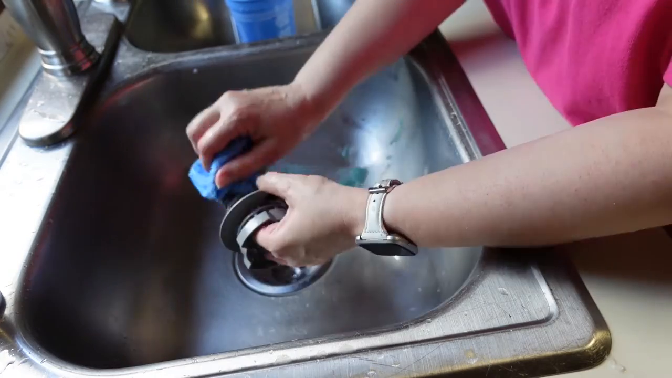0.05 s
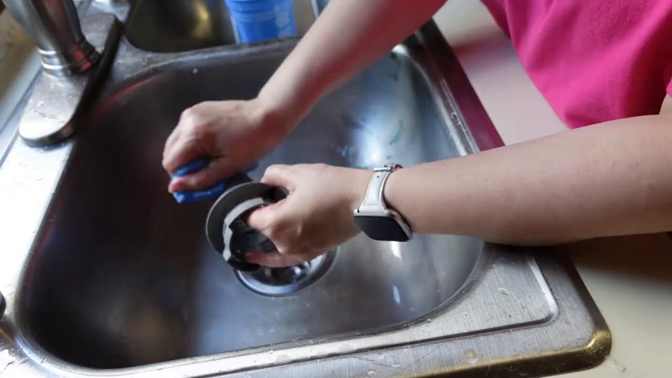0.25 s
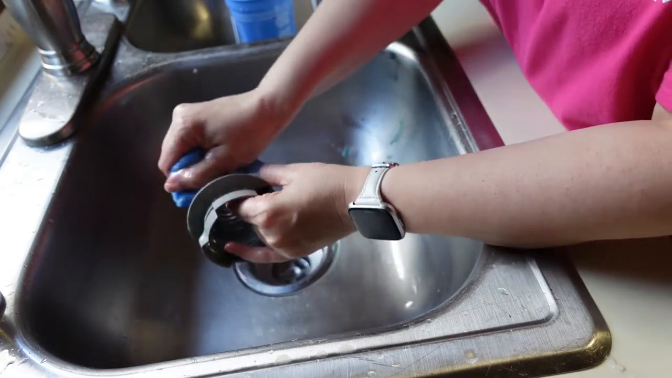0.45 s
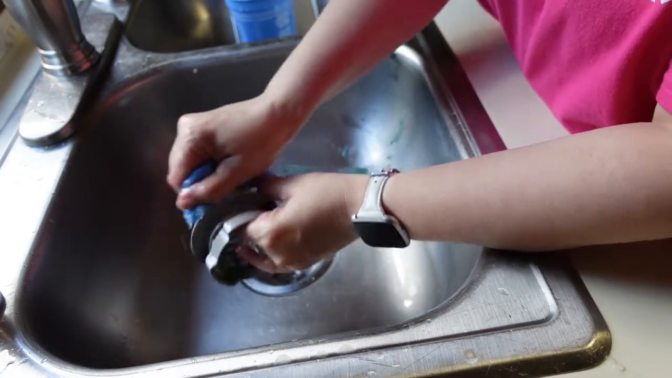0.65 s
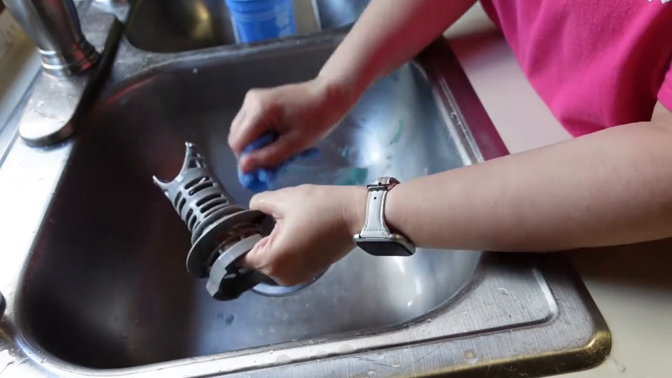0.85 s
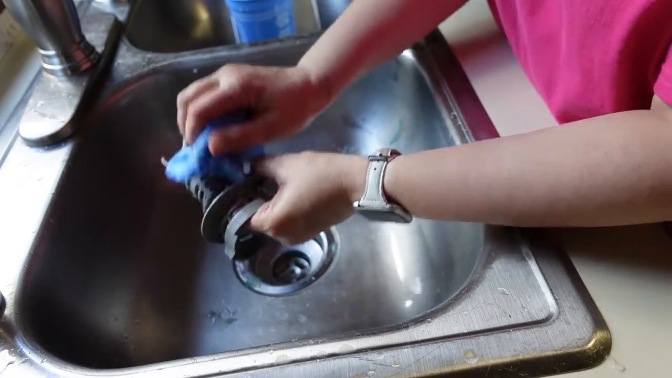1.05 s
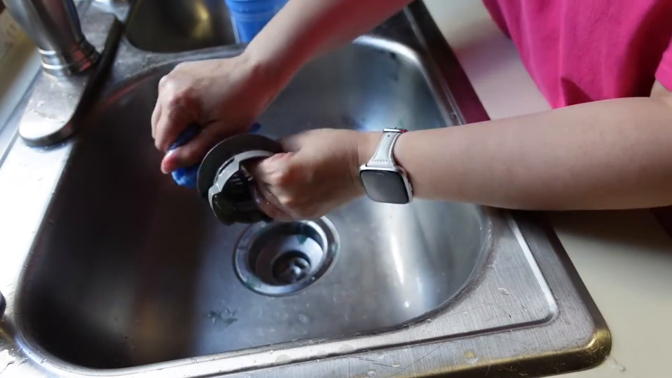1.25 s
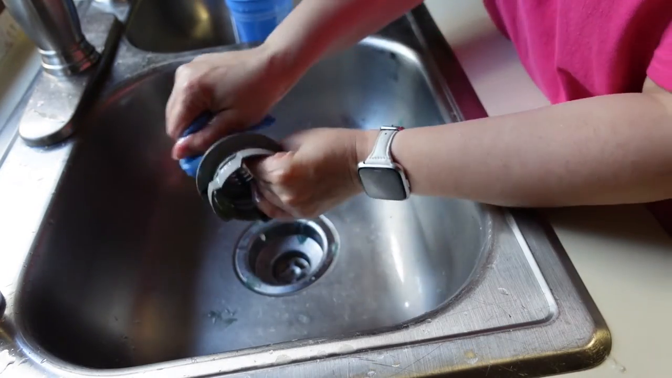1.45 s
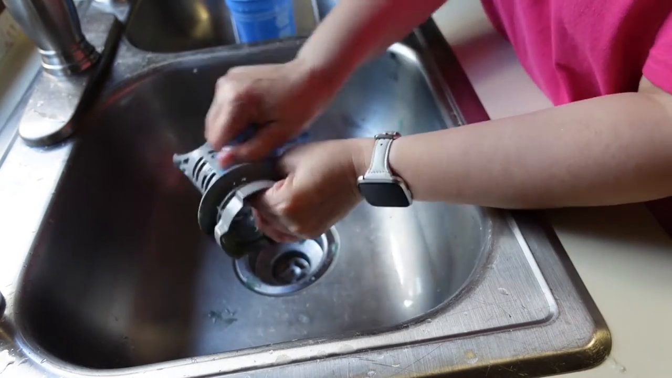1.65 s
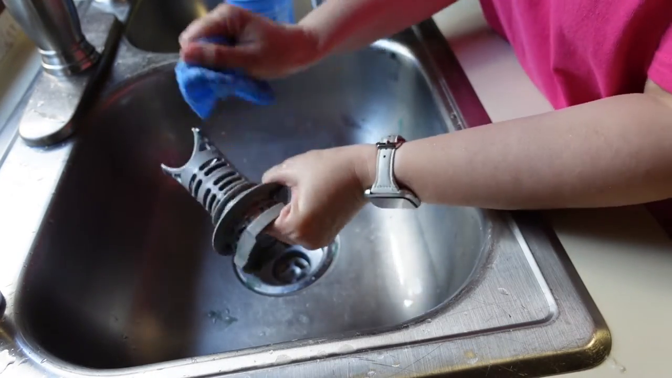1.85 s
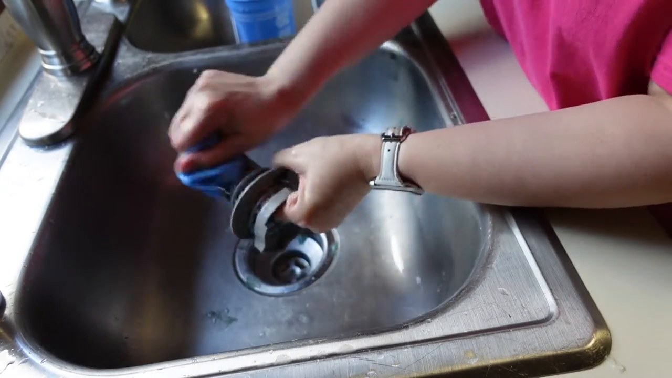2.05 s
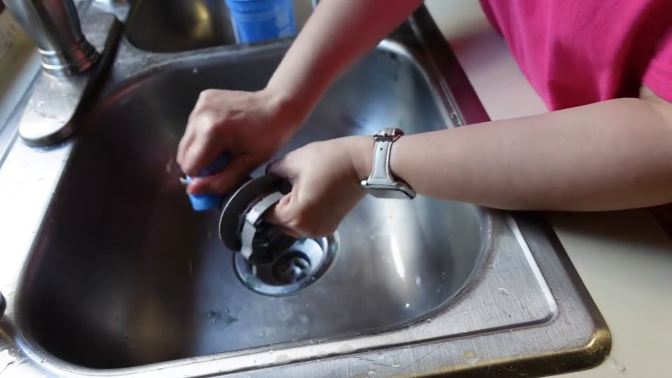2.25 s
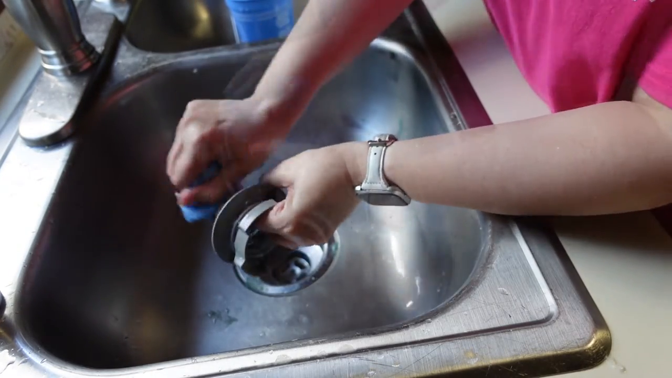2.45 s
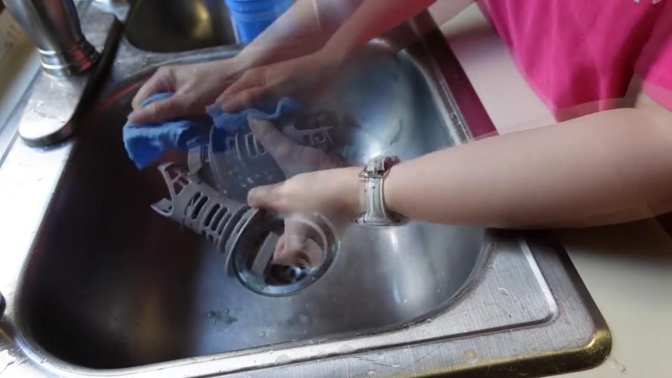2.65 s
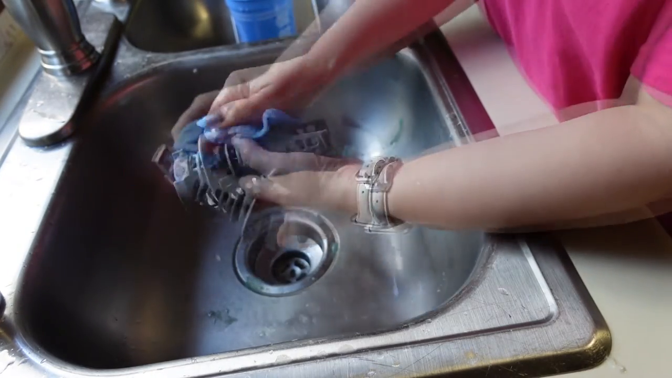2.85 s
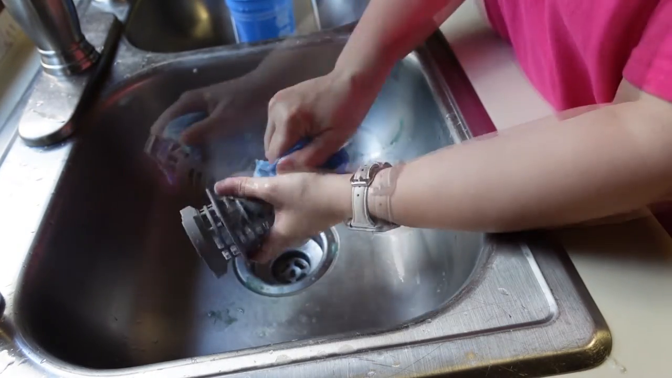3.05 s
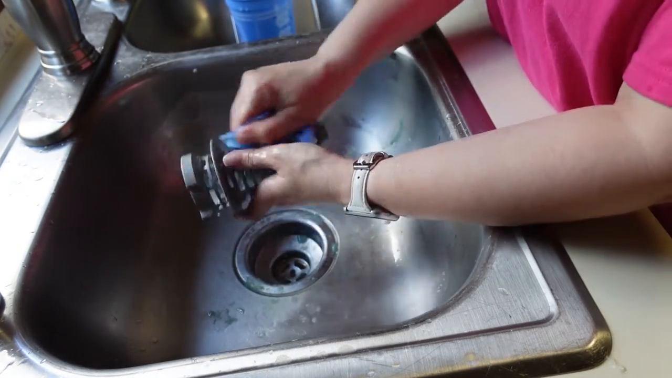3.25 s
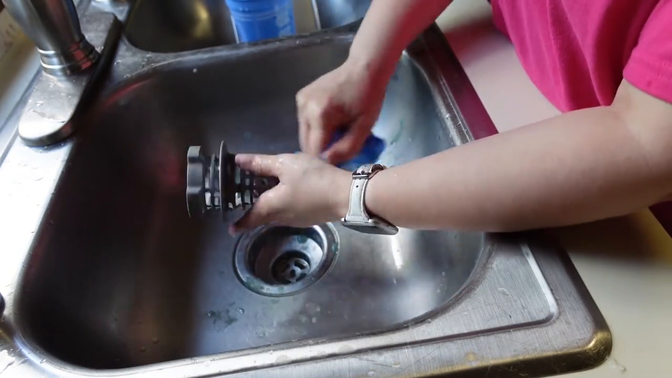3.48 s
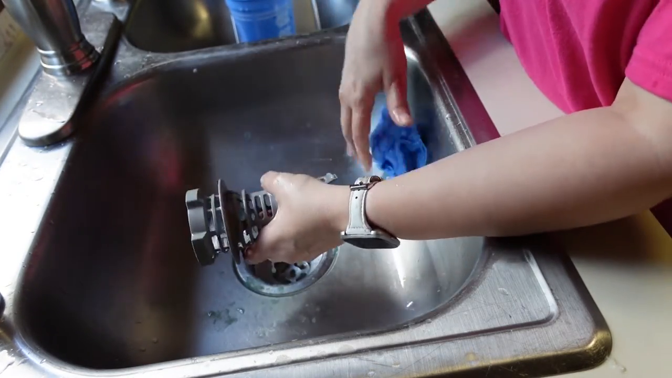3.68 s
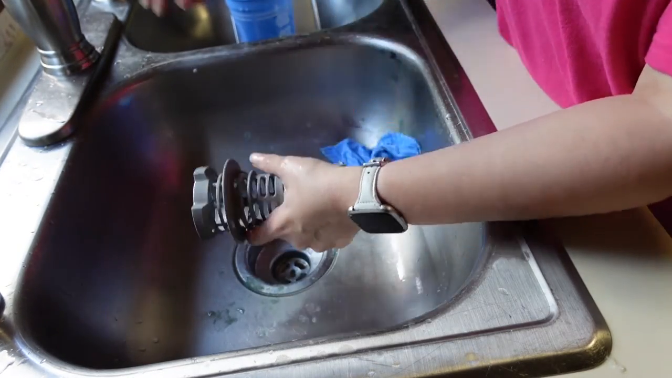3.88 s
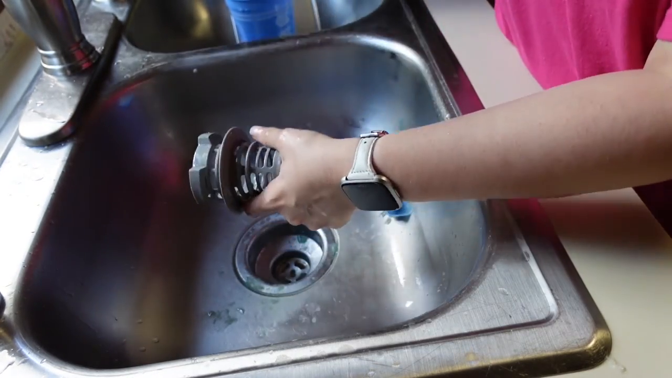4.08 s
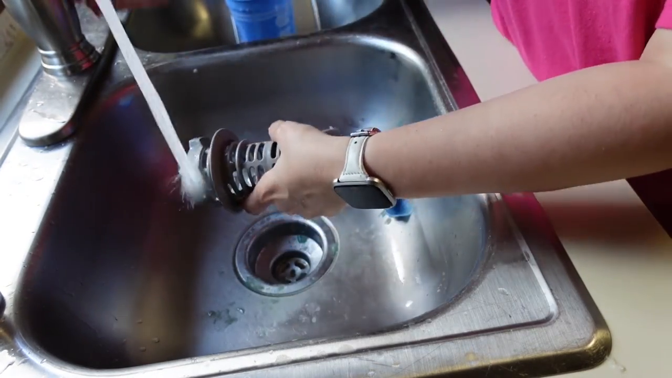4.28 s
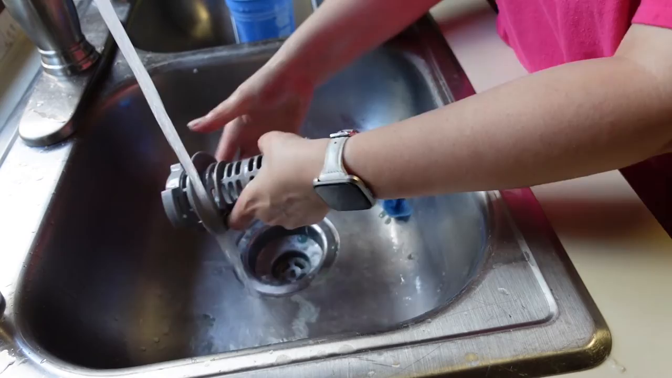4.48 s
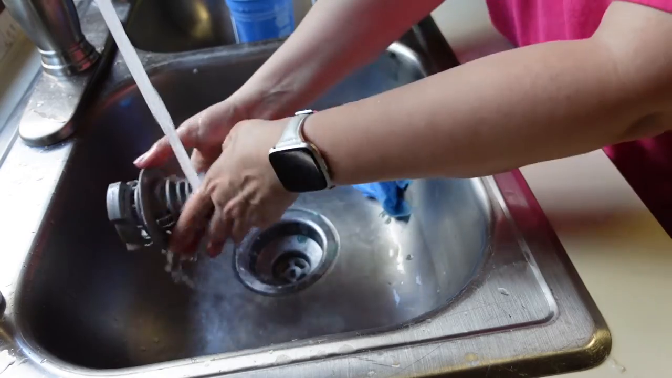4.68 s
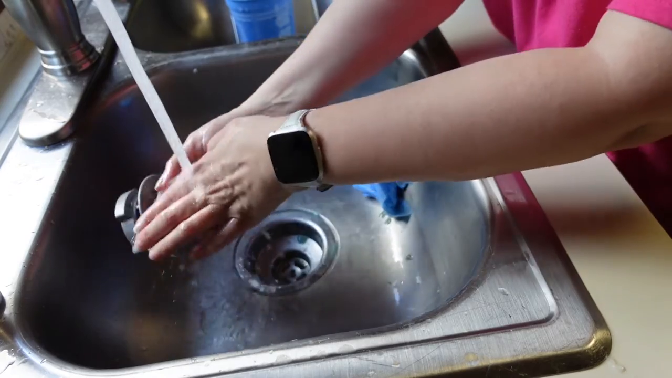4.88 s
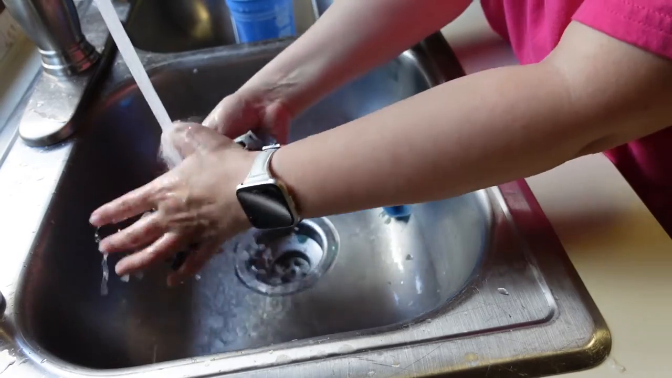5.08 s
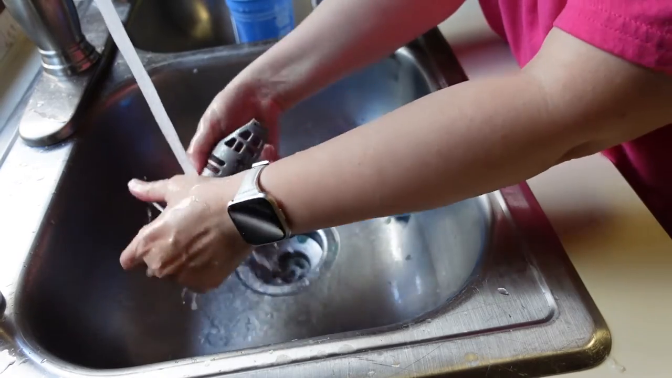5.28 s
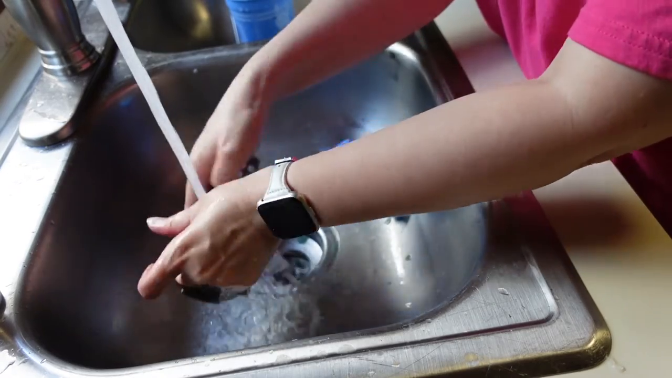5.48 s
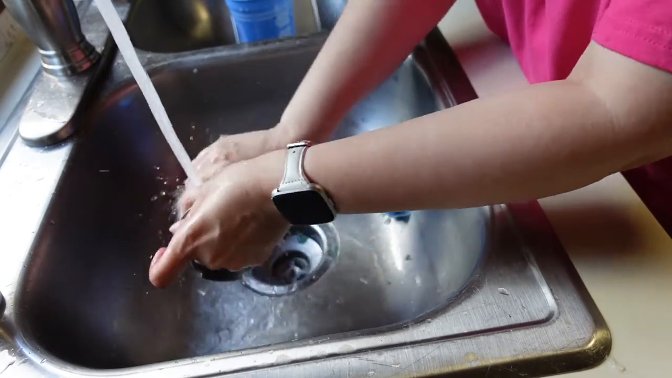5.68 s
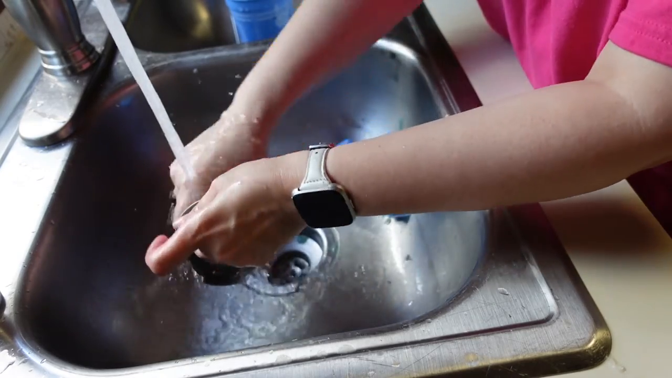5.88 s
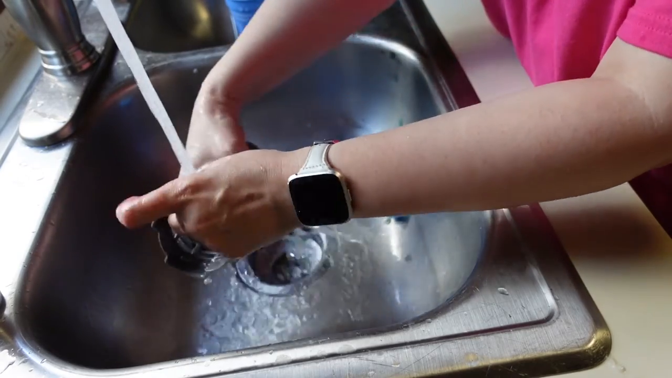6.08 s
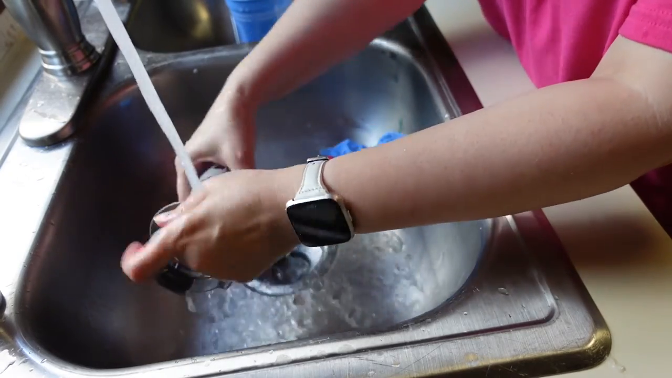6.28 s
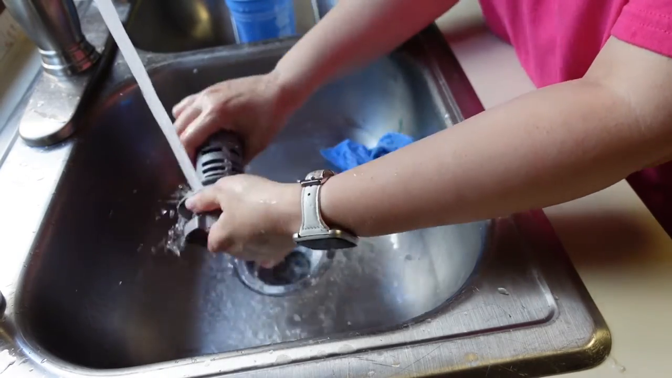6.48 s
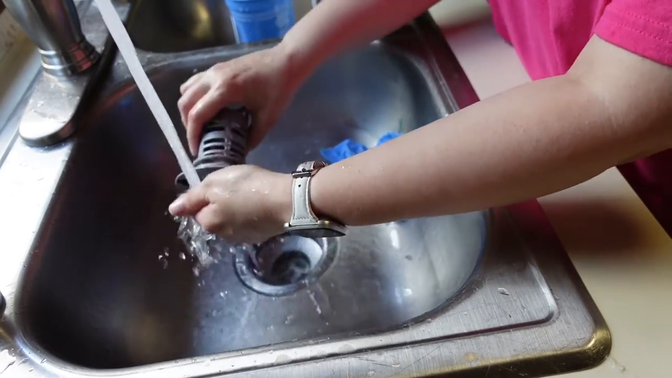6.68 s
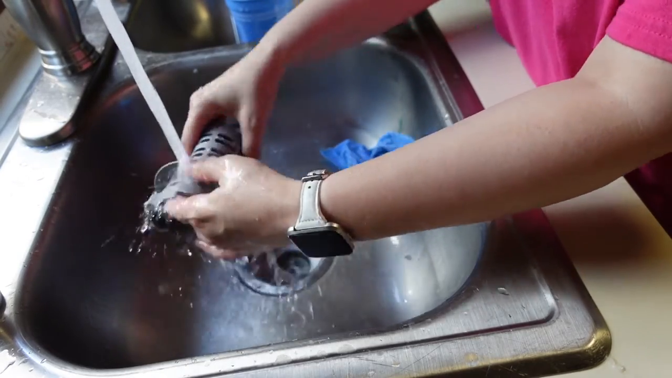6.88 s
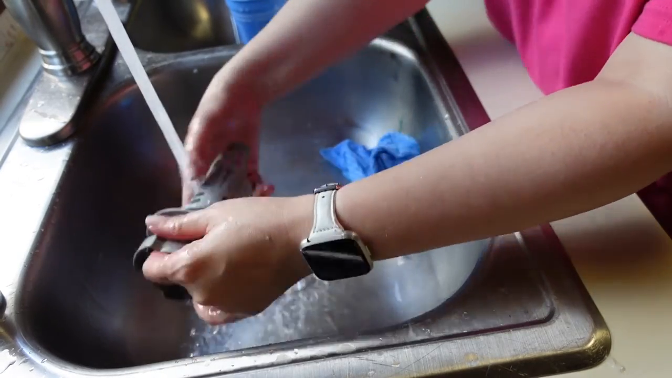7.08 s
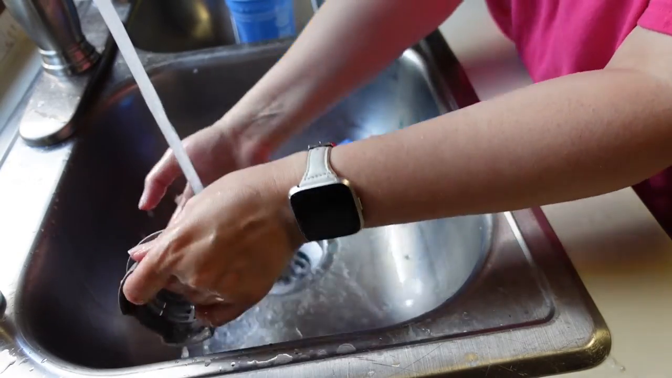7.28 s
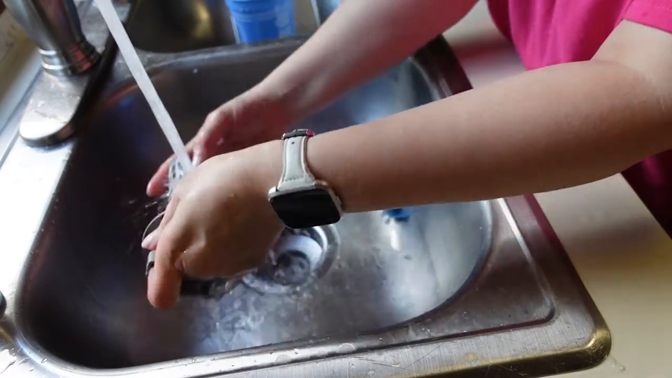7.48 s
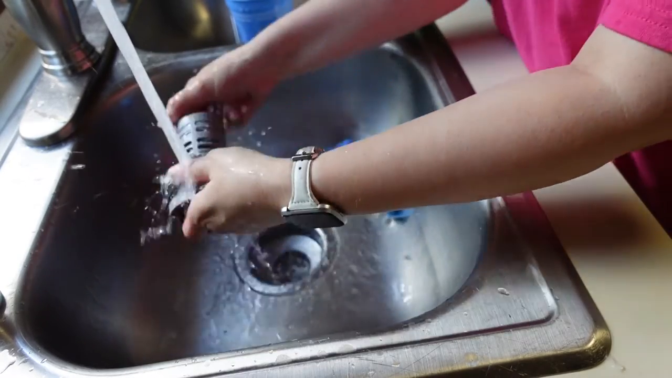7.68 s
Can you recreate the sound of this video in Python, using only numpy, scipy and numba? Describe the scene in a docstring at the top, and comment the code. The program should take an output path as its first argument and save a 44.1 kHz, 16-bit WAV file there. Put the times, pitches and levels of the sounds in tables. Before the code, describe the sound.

A wet cloth rubs a ribbed plastic part in soft crackly strokes over a steel sink, then a tap opens and splashes hissing water with knocks.

```python
"""A hand wipes a slotted plastic part with a wet cloth over a steel kitchen sink, then rinses it under the tap.
Stick-slip friction crackles stroke by stroke and rumbles the basin; part and handle knock on its modes.
At 4.1 s the tap opens: turbulence hisses and the spout resonates; from about 4.36 s droplets and bubbles
spatter as tiny rings, gushes swell the spray and falling water drums the steel, with more knocks to the end.
Faint room noise lies under it all."""
import sys
import numpy as np
from scipy import signal
from scipy.fft import rfft, irfft, next_fast_len
from scipy.io import wavfile
from scipy.ndimage import uniform_filter1d
from numba import njit

SR = 44100
rng = np.random.default_rng(int(sys.argv[2]) if len(sys.argv) > 2 else 0)


def nominal_scale(level):
    """Amplitude ratio for a level in decibels (scalar or array-like)."""
    x = np.asarray(level, float) / 20
    return 10 ** x


def unload_audio(sound):
    """Save the sound as a 16-bit wav file, at the path given as the first command line argument."""
    columns = np.transpose(np.atleast_2d(sound))
    # keep every value between -1 and 1, then stretch to whole-number steps
    steps = np.round(np.clip(columns, -1, 1) * 32767)
    wavfile.write(sys.argv[1], SR, steps.astype(np.int16))


N = 340893  # samples
SILENCED_S = .059  # the first strokes and knocks stop dead here

# Spectral density of the rustling weave: f/Hz, relative level/dB
RUSTLE_SPECTRUM = [(410, -50), (700, -18), (1050, -12), (1740, -6), (2010, -6), (2200, -1), (5550, -1.5),
                   (10400, -8), (14400, -29), (15700, -28)]
# Cloth strokes: t/s of the peak, level/dB at the peak, time/s to rise by 20 dB, time/s to fall by 20 dB, f/Hz
# of the rubbed ribs
CLOTH_STROKES = [(0.0, -43, .01, .06, 3150), (0.021, -34, .005, .07, 5350), (0.153, -37.5, .09, .16, 4570),
                 (0.21, -45, .06, .1, 4200), (0.268, -43, .07, .07, 5170), (0.356, -36, .007, .09, 3520),
                 (0.4, -41, .04, .1, 4540), (0.51, -40, .07, .12, 5050), (0.669, -36, .065, .12, 4200),
                 (0.725, -41, .06, .18, 4300), (1.05, -54, .25, .3, 4650), (1.19, -45, .09, .08, 4220),
                 (1.28, -45, .06, .07, 4800), (1.34, -45.5, .05, .11, 3460), (1.495, -45, .05, .08, 5460),
                 (1.672, -39, .16, .09, 4700), (1.75, -50, .1, .35, 4600), (2.011, -41, .012, .025, 3160),
                 (2.047, -36, .01, .1, 5140), (2.1, -41, .04, .08, 4200), (2.2, -40, .1, .06, 4800),
                 (2.273, -50, .012, .2, 5200), (2.325, -46, .08, .05, 5500), (2.405, -39, .07, .05, 5260),
                 (2.505, -44.5, .07, .1, 5570), (2.555, -46, .07, .11, 4520), (2.72, -56, .25, .06, 4660),
                 (2.775, -51, .04, .14, 3480), (2.922, -49, .04, .2, 4660), (3.022, -51, .12, .06, 4100),
                 (3.27, -46, .14, .07, 5250), (3.445, -42.5, .15, .2, 5400), (3.686, -47, .02, .08, 4800),
                 (3.765, -60, .03, .3, 5000)]
DULL_DB, DULL_PER_DB = -5.5, -0.26  # low-end shelf for a stroke at -49 dB; a firmer stroke is brighter


def strokes():
    """Stick-slip friction: wet weave dragged over ribs rustles as noise and crackles as many short rings."""
    columns = np.transpose(CLOTH_STROKES)
    before = swells(*columns)
    after = swells(*columns[:, columns[0] > SILENCED_S])
    stroke_db, rib_hz = np.where(np.arange(N) < SILENCED_S * SR, before, after)
    dull_db = np.clip(DULL_DB + DULL_PER_DB * (stroke_db + 49), -30, 12)
    weave = level(colour(rng.standard_normal(N), RUSTLE_SPECTRUM), -0.25)
    rustle = patchy(weave, rate=45., depth_db=1.35) * nominal_scale(1.26 * walk(50))
    crackle = nominal_scale(-6) * grains(rib_hz, octaves=0.3, per_s=1300.0, cycles=79.0, scatter_db=8.5, glide=0.96)
    scratches = nominal_scale(-11) * flurries(rib_hz, count=350, t60=.02, scatter_db=3., octaves=.5, cycles=12.)
    return (tilt(rustle, 2400.0, "low", dull_db) + crackle + scratches) * nominal_scale(stroke_db)


# Handling passed on to the basin as rumble: t/s, level/dB
HANDLING_RUMBLE = [(0.0, -60), (0.025, -45), (0.06, -64), (0.2, -80), (0.46, -63.5), (0.85, -74.5),
                   (1.03, -64), (1.4, -74), (1.75, -65.5), (1.99, -72), (2.03, -61), (2.35, -72),
                   (2.9, -88), (3.4, -75), (3.72, -66), (3.985, -78), (4.01, -57), (4.05, -51), (4.12, -55)]


def handling():
    """Structure-borne sound: handling shakes the basin and excites its modes."""
    return nominal_scale(curves(HANDLING_RUMBLE)[0]) * drumming(count=4000, scatter_db=3.0, fall_db=3.0)


# Cloth snagging on a slot: t/s, relative peak level/dB, centre f/Hz
SLOT_SNAGS = [(0.0188, -16.5, 1880), (0.1161, -27, 3850), (0.126, -20, 5540), (0.151, -20, 4440),
              (0.3117, -22, 6240), (0.3306, -20, 5520), (0.3541, -24, 2510), (0.3661, -20, 5480),
              (0.3965, -32, 3690), (0.4943, -37, 3800), (0.5207, -23, 4600), (0.555, -27, 2630),
              (0.621, -28, 3220), (0.636, -30, 3450), (0.6644, -16, 4020), (0.7173, -20, 4280),
              (0.799, -22.5, 4030), (0.9606, -24, 5920), (1.0301, -30, 3260), (1.047, -31, 3320),
              (1.0839, -23, 7630), (1.1179, -34, 3310), (1.265, -27, 4380), (1.329, -35, 3150),
              (1.4805, -29, 7710), (1.7933, -24, 7460), (1.931, -33, 5530), (2.0058, -35, 4600),
              (2.0133, -25, 2580), (2.0448, -18, 4700), (2.162, -33, 3950), (2.1839, -26, 2750),
              (2.2049, -28, 6600), (2.2707, -25, 6790), (2.365, -33, 3820), (2.4044, -17, 5800),
              (2.5551, -28, 3900), (2.919, -24, 4500), (3.113, -32, 5440), (3.3308, -35, 4240),
              (3.4251, -34, 5560), (3.494, -27, 3670), (3.6825, -27, 4800), (3.763, -31, 6630)]


def snags():
    """Sudden slip: each snag lets go in a swarm of short rings that dies by 60 dB in 12 ms."""
    return nominal_scale(-10.0) * bursts(SLOT_SNAGS, .012, rise_s=.0004, octaves=0.393, cycles=24.3, count=40)


def cloth():
    """Superposition of friction, handling rumble and snags; the first two end with the handling table."""
    wiping = np.arange(N) < HANDLING_RUMBLE[-1][0] * SR
    return (strokes() + handling()) * wiping + snags()


# Spectral density of the spray: f/Hz, relative level/dB
SPRAY_SPECTRUM = [(35, -56), (60, -55), (87, -28), (160, -20), (192, -21.5), (243, -11.5), (286, -27),
                  (536, -23.5), (662, -14.5), (896, -19.5), (1760, -12.5), (2620, -6), (4800, -1),
                  (9650, -5), (15700, -24)]
OPEN_DB, FINE_PER_DB = -27, 1.5  # below this flow the spray turns coarser
FINE_DB = -1  # mean shelf on the top of the hiss at full flow


def jet_hiss(flow_db):
    """Turbulence noise: the jet hisses over a broad band, with less treble at low flow."""
    fine_db = FINE_DB + FINE_PER_DB * np.clip(flow_db - OPEN_DB, -20, 0) + 2.6 * walk(14)
    noise = level(colour(rng.standard_normal(N), SPRAY_SPECTRUM), -2.5)
    return tilt(patchy(noise, rate=30., depth_db=1.66), 12500.0, "high", fine_db)


LANDS_S = 4.355  # the stream reaches the basin and starts to spatter


def spatter(centre_hz):
    """Bubble and droplet resonance: tiny rings of rising pitch, with swarms of splats among them."""
    drops = nominal_scale(-8) * grains(centre_hz, octaves=0.42, per_s=2700.0, cycles=23.0, scatter_db=6.5, glide=1.31)
    bubbles = nominal_scale(-11) * grains(centre_hz, octaves=.4, per_s=200., cycles=80., scatter_db=5., glide=1.08)
    splats = nominal_scale(-10) * flurries(centre_hz, count=350, t60=.03, scatter_db=3., octaves=.35, cycles=16.)
    return (drops + bubbles + splats) * (np.arange(N) > LANDS_S * SR)


# Air in spout and aerator: f/Hz, bandwidth/Hz, relative level/dB
SPOUT_RESONANCES = [(2670, 88, -1.5), (3370, 420, -5), (3820, 110, -4), (4430, 160, -5), (4800, 33, -10),
                    (5800, 48, -18)]


def spout(flow_db):
    """Cavity resonance: noise excites the air in the spout, which sings evenly once the valve is open."""
    singing = level(resonate(rng.standard_normal(N), SPOUT_RESONANCES), -5)
    return singing * nominal_scale(uniform_filter1d(np.minimum(flow_db + 3.5, -27), 900))


# Gushes thrown off hands and plastic: t/s, relative peak level/dB, centre f/Hz
WATER_GUSHES = [(4.1572, -20, 4540), (4.3558, 1, 4830), (4.4242, 1.5, 6740), (4.456, 1, 6500),
                (4.492, -8, 4780), (4.5207, -3, 4260), (4.54, 0.5, 4100), (4.688, 2.5, 6700),
                (4.758, -8.5, 3640), (4.9906, -6, 3960), (5.156, -4, 3100), (5.244, -9, 4930),
                (5.3, -5, 5950), (5.335, -7, 3630), (5.4928, -5, 4300), (5.5186, -18, 4370),
                (5.5586, 0.5, 5350), (5.809, -12, 3720), (5.858, -6, 4160), (5.895, -14, 4850),
                (5.9854, -4, 4860), (6.205, -8, 4640), (6.237, -4.5, 3370), (6.2814, -5.5, 3110),
                (6.3416, -3, 3830), (6.4093, -0.5, 6140), (6.445, -4, 4370), (6.642, -1, 4400),
                (6.682, -8, 5000), (6.7843, -1, 3470), (6.94, -8, 4300), (7.053, -2, 5000),
                (7.1606, -4.5, 4500), (7.219, 0, 6500), (7.2597, -6, 4340), (7.335, -3.5, 4520),
                (7.495, -3, 5050), (7.6179, -3, 5500), (7.7047, -3.5, 6800)]
SURGE_DB, SURGE_LATE_S = -24, .006  # the spray swells with each gush, a little after it
SURGE_RISE_S, SURGE_FALL_S = .015, 0.075  # times to rise and fall by 20 dB


def surges():
    """Energy summation: the swell of the spray that goes with each gush, as level and pitch."""
    s, gush_db, gush_hz = np.transpose(WATER_GUSHES)
    rise_s, fall_s = np.full_like(s, SURGE_RISE_S), np.full_like(s, SURGE_FALL_S)
    return swells(s + SURGE_LATE_S, gush_db + SURGE_DB, rise_s, fall_s, gush_hz)


def gushes():
    """Splash impact: thrown water lands as a swarm of rings that dies by 60 dB in 70 ms."""
    return nominal_scale(-16.0) * bursts(WATER_GUSHES, .07, rise_s=.005, octaves=0.245, cycles=34.0, count=200)


# Tap: t/s, spray gain level/dB, level/dB of the drumming on the steel
TAP_FLOW = [(4.1, -78, -63), (4.126, -75, -51), (4.134, -52, -53), (4.166, -38.5, -42.5), (4.212, -32, -45),
            (4.298, -31, -57), (4.35, -30, -59), (4.358, -24, -54.5), (4.65, -26.5, -54), (4.8, -23.5, -61),
            (4.95, -23.5, -50), (5.17, -26, -55), (5.48, -23.5, -39), (5.8, -24, -53.5), (6.0, -24.5, -53),
            (6.15, -24.5, -44), (6.25, -23.5, -40), (6.55, -24.5, -43.5), (6.7, -22, -47),
            (6.88, -24, -43.5), (7.0, -25, -45.5), (7.09, -22.5, -44), (7.15, -25.5, -41),
            (7.3, -23.5, -44), (7.45, -24.5, -43), (7.73, -24.5, -46)]
SPATTER_HZ, SPATTER_OCTAVES = 4500, 0.103  # pitch of the spatter between gushes and how far it wanders


def water():
    """Superposition of jet, spatter, spout, gushes and the steel drummed by the falling water."""
    flow_db, drum_db = curves(TAP_FLOW)
    surge_db, surge_hz = surges()
    share = 1 / (1 + nominal_scale(2 * (flow_db - surge_db)))  # of the power that comes from a gush
    spray_db = flow_db - 10 * np.log10(1 - share + 1e-9)
    steady_hz = SPATTER_HZ * 2 ** (SPATTER_OCTAVES * walk(12))
    spatter_hz = (1 - share) * steady_hz + share * surge_hz
    spray = (jet_hiss(flow_db) + spatter(spatter_hz)) * nominal_scale(spray_db)
    wavering_db = 1.5 * walk(12)
    drum = nominal_scale(drum_db + wavering_db) * drumming(count=4000, scatter_db=3., fall_db=-0.3)
    running = np.arange(N) >= TAP_FLOW[0][0] * SR
    return (spray + spout(flow_db) + drum) * running + gushes()


# Modes of the basin with the part in it:
# f/Hz, relative level/dB when knocked, t60/s, relative level/dB when shaken or drummed
BASIN_MODES = [(93, -2, 0.13, -4), (159.5, 2, 0.15, 0), (201.6, 11, 0.14, -8.5), (248, 1, 0.18, -0.5),
               (313.5, 3, 0.086, -4), (390, -1.5, 0.18, -10.5), (426.7, -4, 0.13, -4.5),
               (463, -4, .15, -10.5), (532, -2, 0.064, -4), (601, 0.5, 0.11, -6), (665.6, -7.5, 0.21, -4),
               (768, -5.5, 0.1, -7.5), (949, -8, 0.072, -6.5), (1033, 1.5, 0.049, -1),
               (1145, -1, 0.16, -12), (1421, 0.5, 0.039, -1.5), (1542, 0, 0.094, -9),
               (1879, -1.5, 0.09, -6), (2060, -9.5, 0.1, -6), (2620, -25, 0.075, -5.5)]


def drumming(count, scatter_db, fall_db):
    """Modal excitation: countless soft pushes, each on one basin mode; fall_db is taken off per octave."""
    hz, _, t60, mode_db = np.transpose(BASIN_MODES)
    at = rng.random(count) * N / SR
    struck = rng.integers(0, len(hz), count)
    push_db = mode_db - fall_db * np.log2(hz / hz[0])
    size = nominal_scale(push_db[struck] + scatter_db * rng.standard_normal(count))
    return level(rings(at, hz[struck], t60[struck], size, 0.985, 0.92, 1. * SR), 0)


def knocks(table):
    """Modal impact: a blow rings the modes near the favoured pitch; a sharp one also wakes the upper modes."""
    s, db, spot_hz, sharp_db = np.transpose(table)[:, :, None]
    hz, mode_db, t60, _ = np.transpose(BASIN_MODES)
    near = nominal_scale(-250 * np.log2(hz / spot_hz) ** 2)
    upper = nominal_scale(sharp_db) * (hz > 1.2 * spot_hz)
    size = nominal_scale(db + mode_db) * (near + upper)
    detuned_hz = hz * (1 + 0.0099 * rng.standard_normal(size.shape))
    start, decay = s + 0 * hz, t60 + 0 * s  # one entry per blow and mode
    return rings(start.ravel(), detuned_hz.ravel(), decay.ravel(), size.ravel(), 0.985, 1.5, 1. * SR)


# Knocks: t/s, relative peak level/dB, f/Hz favoured by the spot struck, sharpness level/dB
KNOCK_TIMES = [(0.029, -50, 280, -1), (0.035, -33.5, 390, -11), (0.98, -45, 880, -12),
               (1.536, -40, 483, -22), (1.581, -35, 486, -28), (1.635, -37, 525, -34),
               (1.64, -38, 510, -35), (1.8, -54, 245, -10), (2.007, -42.5, 726, -6),
               (2.286, -38.5, 880, -15), (3.622, -48, 616, -12), (3.829, -54, 595, -17),
               (4.034, -33, 288, -23), (4.078, -39.5, 416, -22), (4.129, -36.5, 145, -10.5),
               (4.148, -27.5, 393, -16.5), (4.187, -50, 415, -23), (4.223, -29, 354, -21),
               (4.238, -49, 380, -24), (4.356, -36, 161, -26), (4.842, -26, 506, -10),
               (4.862, -27.5, 534, -22), (5.426, -29, 960, -21), (5.454, -27, 548, -18),
               (5.516, -33, 1020, -6), (5.541, -30, 1035, -13), (5.666, -33, 367, -12),
               (5.73, -28, 394, -9), (5.755, -26.5, 396, -15), (5.777, -33, 385, -4),
               (5.829, -30.5, 420, -6.5), (5.854, -32.5, 1140, 4), (5.857, -25.5, 410, -25),
               (5.879, -30, 403, -13), (5.897, -23.5, 410, -12), (5.924, -28, 394, -7),
               (5.948, -33, 390, -7), (6.301, -39, 244, -1.5), (7.199, -37, 457, -7),
               (7.6, -38.5, 248, -2.5)]


def blows():
    """Damped impacts: part and handle strike the basin; the earliest rings are cut off short."""
    early = [row for row in KNOCK_TIMES if row[0] < SILENCED_S]
    cut_short = knocks(early) * (np.arange(N) < SILENCED_S * SR)
    return cut_short + knocks(KNOCK_TIMES[len(early):])


# Spectral density of the room noise: f/Hz, relative level/dB
ROOM_SPECTRUM = [(18, -80), (30, -38), (97, -5.5), (337, -9), (364, -6), (524, -7), (662, -3.5),
                 (815, -3.5), (1730, -8.5), (1920, -13), (15000, -27.5)]


def kitchen():
    """Ambient noise: a quiet, slightly unsteady random background."""
    return level(colour(rng.standard_normal(N), ROOM_SPECTRUM), -63) * nominal_scale(0.14 * walk(5.5))


@njit
def rings(s, hz, t60, size, glide, swell, sr):
    """Damped oscillation: sines that swell over some cycles and die; pitch moves by the factor glide over t60."""
    out = np.zeros(N)
    for k in range(len(s)):
        start, count = int(s[k] * sr), int(t60[k] * sr) + 1
        step = np.exp(2j * np.pi * hz[k] / sr - np.log(1000) / count)
        turn = np.exp(2j * np.pi * hz[k] * (glide - 1) / sr / count)
        z = size[k] + 0j
        held, ease = 1., np.exp(-hz[k] / sr / swell)
        for i in range(start, min(start + count, N)):
            out[i] += z.imag * (1 - held)
            z, step, held = z * step, step * turn, held * ease
    return out


def grains(centre_hz, octaves, per_s, cycles, scatter_db, glide):
    """Granular texture: random tiny rings scattered in pitch about a moving centre; low ones are weaker."""
    count = int(per_s * N / SR)
    at = rng.integers(0, N, count)
    spread, size = rng.standard_normal((count, 2)).T
    hz = np.clip(centre_hz[at] * 2 ** (octaves * spread), 400, 16000)
    size = nominal_scale(scatter_db * np.clip(size, -2, 2)) * np.minimum(hz / centre_hz[at], 1) ** 2
    return level(rings(at / SR, hz, cycles / hz, size, glide, 1.0, 1. * SR), 0)


def bursts(table, t60, rise_s, octaves, cycles, count):
    """Clustered impulses: each event is a swarm of grains about its centre that thins out over t60."""
    s, db, hz = np.transpose(table)[:, :, None]
    late = rng.random((len(table), count))
    spread = rng.standard_normal((len(table), count))
    after = late ** 2 * (rise_s + t60)  # densest at the start
    size = nominal_scale(db - 60 * np.maximum(after - rise_s, 0) / t60) * np.minimum(after / rise_s, 1)
    pitch = np.clip(hz * 2 ** (octaves * spread), 500, 14000)
    size = size * np.minimum(pitch / hz, hz / pitch)  # grains far from the centre are weaker
    pitch = pitch.ravel()
    return rings((s + after).ravel(), pitch, cycles / pitch, size.ravel(), 1., 1.2, 1. * SR)


def flurries(centre_hz, count, t60, scatter_db, octaves, cycles):
    """Random clustering: small swarms, each with its own size and a centre pitch of at least 3 kHz."""
    at = rng.integers(0, N, count)
    spread, size = rng.standard_normal((count, 2)).T
    hz = np.clip(centre_hz[at] * 2 ** (.4 * spread), 3000, 9000)
    table = np.transpose([at / SR, scatter_db * np.clip(size, -2, 2), hz])
    return level(bursts(table, t60, .003, octaves, cycles, count=40), 0)


def swells(s, db, rise_s, fall_s, hz):
    """Energy summation: joint level in dB of overlapping swells, and their power-weighted mean pitch."""
    grid = np.arange(0, N, 32) / SR
    late = grid - s[:, None]
    drop_db = 20 * np.maximum(late / fall_s[:, None], -late / rise_s[:, None])
    power = nominal_scale(2 * (db[:, None] - drop_db)) + 1e-14
    total = power.sum(axis=0)
    columns = 10 * np.log10(total), hz @ power / total
    return [np.interp(np.arange(N) / SR, grid, column) for column in columns]


def resonate(x, peaks):
    """Parallel resonance: a sum of resonant band-passes."""
    return sum(nominal_scale(db) * signal.lfilter(*signal.iirpeak(hz, hz / width, fs=SR), x) for hz, width, db in peaks)


def patchy(x, rate, depth_db):
    """Band-wise modulation: each half octave of the treble flickers, partly in step with its neighbours."""
    walks = [walk(rate) for _ in range(9)]
    bands = half_octaves(x, 1470.0, count=8)
    return sum(nominal_scale(depth_db * (walks[k] + walks[k + 1]) / np.sqrt(2)) * band for k, band in enumerate(bands))


def half_octaves(x, low_hz, count):
    """Filter-bank splitting: overlapping half-octave bands that add up to x; first and last are open-ended."""
    size = next_fast_len(N)
    whole = rfft(x, size)
    hz = np.arange(1, size // 2 + 2) * SR / size
    place = np.clip(2 * np.log2(hz / low_hz), 0, count - 1)
    return [irfft(whole * np.maximum(1 - abs(place - k), 0), size)[:N] for k in range(count)]


def tilt(x, corner_hz, kind, db):
    """Shelving: raises or lowers one end of the spectrum by a moving amount."""
    end = signal.sosfilt(signal.butter(1, corner_hz, kind, fs=SR, output="sos"), x)
    return x + (nominal_scale(db) - 1) * end


def spectrum_db(table, hz):
    """Logarithmic interpolation: reads a spectrum on a log-frequency axis."""
    points_hz, db = np.transpose(table)
    return np.interp(np.log(np.maximum(hz, 1)), np.log(points_hz), db)


def colour(x, table):
    """Linear filtering: shapes x by a spectrum."""
    size = next_fast_len(N)
    hz = np.arange(size // 2 + 1) * SR / size
    return irfft(rfft(x, size) * nominal_scale(spectrum_db(table, hz)), size)[:N]


def level(x, db):
    """Power normalisation: scales x to an rms level."""
    return x * nominal_scale(db) / np.sqrt(np.mean(x ** 2))


def curves(table):
    """Linear interpolation: the columns of a table at every sample."""
    s, *columns = np.transpose(table)
    return [np.interp(np.arange(N) / SR, s, column) for column in columns]


def walk(rate):
    """Smoothed randomness: random levels held for 1 / rate s and slewed twice; standard deviation 1."""
    k = int(SR / rate)
    held = np.repeat(rng.standard_normal(N // k + 1), k)
    x = uniform_filter1d(uniform_filter1d(held, k), k)[:N]
    return x / np.std(x)


def diffuse(x, rate):
    """Decorrelation: many small sources all over the basin, so each band jumps about between left and right."""
    return sum(walk(rate) * band for band in half_octaves(x, 404.0, count=11))


# Stereo width, side against mid: f/Hz, relative level/dB
STEREO_SPREAD = [(60, -23), (110, -22), (200, -21), (380, -15), (700, -11), (1290, -13), (2380, -15),
                 (4400, -11.5), (8120, -9.5), (15000, -5)]
# Balance, left minus right: f/Hz, level/dB
LEFT_LEAN = [(60, 0.0), (110, -0.5), (200, -0.5), (380, -0.5), (700, -0.5), (1290, 0.5), (2380, 0.5),
             (4400, 1.0), (8120, 1.5), (15000, 2.0)]


def scene():
    """Mid-side stereophony: sources in the middle; bands wandering at random left and right give the width."""
    mid = cloth() + water() + blows() + kitchen()
    side = nominal_scale(.6) * colour(diffuse(mid, rate=110.), STEREO_SPREAD)
    left = colour(mid, [(hz, db / 2) for hz, db in LEFT_LEAN])
    right = colour(mid, [(hz, -db / 2) for hz, db in LEFT_LEAN])
    return np.array([left + side, right - side])


def roll_off(x):
    """The treble ends steeply here."""
    return signal.sosfilt(signal.butter(12, 15890, fs=SR, output="sos"), x)


def record(dry):
    """High-pass response: the microphone drops the deep bass."""
    mix = signal.sosfilt(signal.butter(2, 70., "high", fs=SR, output="sos"), dry)
    return roll_off(mix)


dry = scene()
out = record(dry)
unload_audio(out)
```